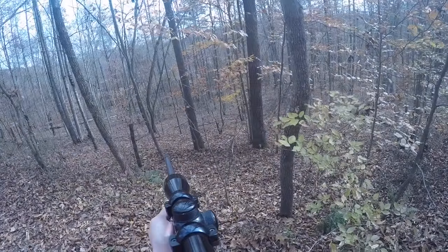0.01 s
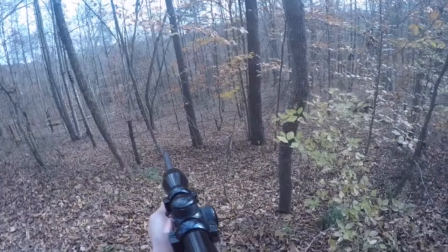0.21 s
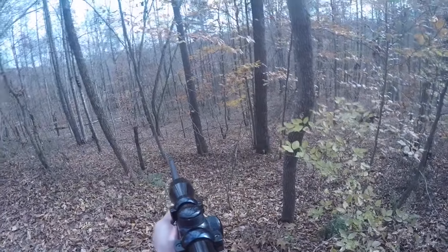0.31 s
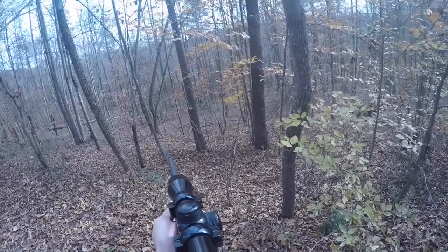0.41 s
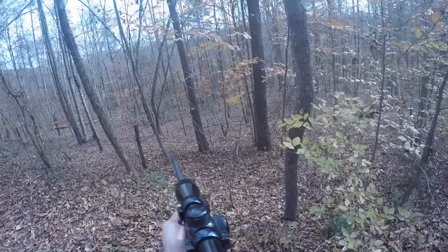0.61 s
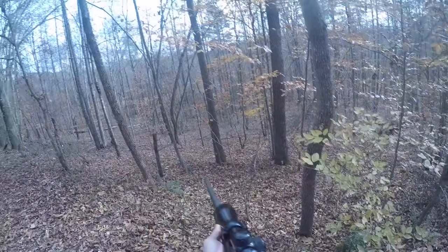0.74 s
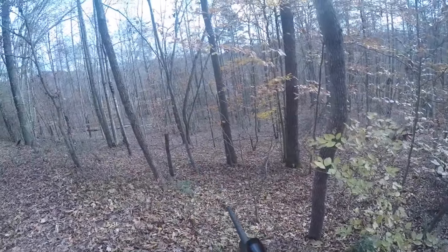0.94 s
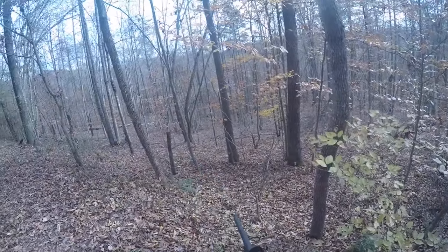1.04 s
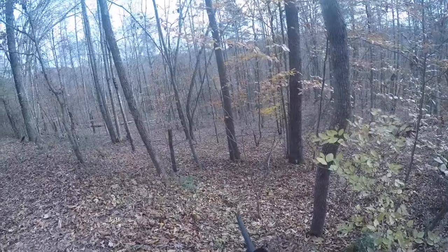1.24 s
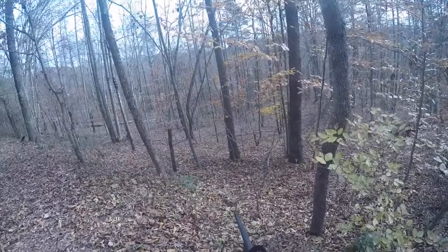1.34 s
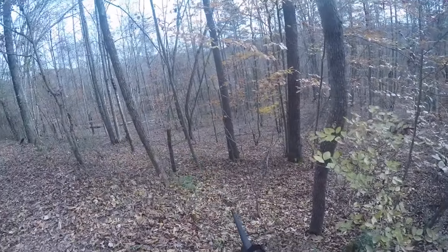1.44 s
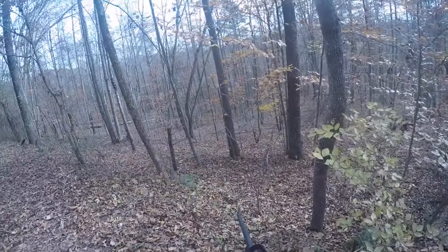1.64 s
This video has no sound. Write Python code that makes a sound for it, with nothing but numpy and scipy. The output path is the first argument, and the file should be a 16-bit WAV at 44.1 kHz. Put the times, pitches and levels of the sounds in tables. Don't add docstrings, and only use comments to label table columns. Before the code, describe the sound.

After a moment of light wind rumble, a single hard rifle crack overloads the nearby microphone. Quick slaps off trees blur into a long dying woodland echo, ending with small dry clicks of the gun's action.

```python
import sys
import numpy as np
from scipy import signal
from scipy.fft import rfft, irfft
from scipy.io import wavfile
from scipy.ndimage import uniform_filter1d

SR = 44100
rng = np.random.default_rng(int(sys.argv[2]) if len(sys.argv) > 2 else 0)


def file_out(sig):
    cols = np.atleast_2d(sig).T
    lim = np.clip(cols, -1, 1)
    pcm = np.round(lim * 32767).astype(np.int16)
    wavfile.write(sys.argv[1], SR, pcm)


def nominal_scale(level):
    x = np.asarray(level, float) / 20
    return 10 ** x


N = 74970
T = np.arange(N) / SR
PIN_S, FREE_S, DROP_S = .2229, .22425, .2294


def rms_one(x):
    return x / np.sqrt(np.mean(x ** 2) + 1e-20)


def at_hz(points, hz):
    table = np.array(points)
    return np.interp(np.log(hz), np.log(table[:, 0]), table[:, 1])


def drift(rate):
    r = np.exp(-80 * np.pi * rate / SR)
    noise = rng.standard_normal(N // 40 + 2002)
    slow = signal.lfilter([1], [1, -2 * r, r * r], noise)[2000:]
    return np.interp(np.arange(N) / 40, np.arange(len(slow)), rms_one(slow))


def ring(x, hz, t60):
    r, w = nominal_scale(-60 / (t60 * SR)), 2 * np.pi * hz / SR
    return signal.lfilter([0, np.sin(w)], [1, -2 * r * np.cos(w), r * r], x + 1e-18)


def low(x, hz):
    return signal.sosfilt(signal.butter(2, hz, fs=SR, output="sos"), x)


def fade(start, tau, length=0.):
    return (T >= start) * np.exp(-np.maximum(T - start - length, 0) / tau)


def coloured(x, spectrum):
    hz = np.maximum(np.fft.rfftfreq(N, 1 / SR), 1)
    gain_db = at_hz(spectrum, hz) - 200 * (hz < 20)
    return rms_one(irfft(rfft(x) * nominal_scale(gain_db), N))


# [t/s, level/dB]
WIND = [(0, -55.5), (.09, -48.5), (.2, -52), (.3, -82), (.45, -53.5), (.55, -64.5), (.75, -66), (1.0, -63),
        (1.15, -60.5), (1.25, -53), (1.4, -51.5), (1.55, -46), (1.62, -51.5), (1.7, -53)]
# [f/Hz, level/dB]
HISS = [(150, -9), (400, 7), (600, 3), (2500, 4), (6300, -0.5), (7500, -2), (14500, -9.5), (15300, -11.5)]


def air():
    wind_hz, skirt_hz, skirt_db = 46.6, 220, -17.5
    buffet_hz, buffet_db = 410, -10.5
    evenness = .6
    hiss_db, duck_db, recover_db_per_s = -62.5, 17.5, 14.5

    white = rng.standard_normal((2, N))
    gust = low(low(white[0], wind_hz), wind_hz * 1.2)
    skirt = low(white[0], skirt_hz)
    buffet = low(ring(white[1], buffet_hz, .006), 550)
    wind = rms_one(gust) + nominal_scale(skirt_db) * rms_one(skirt) + nominal_scale(buffet_db) * rms_one(buffet)
    wind = signal.sosfilt(signal.butter(2, 12, "high", fs=SR, output="sos"), wind)
    local_power = uniform_filter1d(wind ** 2, size=2600)
    wind = rms_one(wind / local_power ** (evenness / 2))

    ducked_db = (T > PIN_S) * np.maximum(duck_db - recover_db_per_s * (T - PIN_S), 0)
    hiss = nominal_scale(hiss_db - ducked_db) * coloured(white[1], HISS)
    return nominal_scale(np.interp(T, *np.transpose(WIND))) * wind + hiss


# [f/Hz, level/dB]
NEAR_COLOUR = [(60, -23.5), (190, -10), (620, -16.5), (2600, -8), (5000, -0.5), (6500, -6.5), (7300, -12),
               (15400, -17)]
MIDDLE_COLOUR = [(60, -12), (200, -13), (600, -15.5), (2600, 4.5), (3600, -4), (6600, -11), (7300, -13.5),
                 (15000, -33)]
FAR_COLOUR = [(220, -14), (360, 3), (750, -2.5), (2000, -1), (3100, -5.5), (3500, -17.5), (7000, -40.5),
              (9000, -54.5)]
# [f/Hz, fall time/s]
NEAR_FALL = [(100, .25), (400, 0.19), (1500, 0.34), (3000, 0.39), (6000, 0.31), (10000, 0.36),
             (15000, 0.26)]
MIDDLE_FALL = [(100, .8), (500, 0.56), (2500, 1.19), (5000, 1.71), (8000, 1.11), (11000, 0.6), (15000, .4)]
# [t/s, level/dB, width/s]
SWELLS = [
    (0.258, 3, 0.0052),
    (.268, -1, 0.0054),
    (.287, 4.5, 0.0088),
    (0.295, -2.5, 0.0035),
    (0.317, -2, 0.0047),
    (0.33, 4.5, 0.014),
    (0.561, 3, 0.12),
    (0.972, 2.5, 0.017),
    (1.09, 3.5, 0.029),
    (1.42, 3, 0.058),
]


def woods():
    near_db, middle_db, far_db = -18, -33, -41.5
    trunks_per_s, growth = 14000, 40000
    trunk_spread_db, patchy_db = 2.0, .7

    age = np.maximum(T - DROP_S, 0)
    share = np.minimum((trunks_per_s + growth * age) / SR, 1)
    size_db = trunk_spread_db * np.minimum(rng.exponential(1, N), 4)
    sizes = nominal_scale(size_db) * rng.standard_normal(N)
    grains = rms_one(sizes * (rng.random(N) < share) / np.sqrt(share))
    layers = [rfft(coloured(grains, colour)) for colour in (NEAR_COLOUR, MIDDLE_COLOUR, FAR_COLOUR)]

    octave = np.log2(np.maximum(np.fft.rfftfreq(N, 1 / SR), 1))
    shared, out = drift(42), 0
    for centre in np.arange(5.5, 14.6, .5):
        hz = 2 ** centre
        mask = np.maximum(1 - 2 * np.abs(octave - centre), 0)
        far_fall_s = at_hz([(1500, 8.7), (5000, 6.2)], hz)
        levels_db = (near_db - 60 * age / at_hz(NEAR_FALL, hz),
                     middle_db - 60 * age / at_hz(MIDDLE_FALL, hz),
                     far_db - 60 * age / far_fall_s)
        patch = nominal_scale(patchy_db * (shared + drift(20)))
        band = sum(nominal_scale(db) * irfft(x * mask, N) for db, x in zip(levels_db, layers))
        out = out + patch * band
    swell_db = sum(db * np.exp(-((T - s) / width) ** 2) for s, db, width in SWELLS)
    return out * nominal_scale(swell_db) * (T >= DROP_S)


# [t/s, peak level/dB, f/Hz]
SLAPS = [(.2395, -5, 1800), (.2408, -3, 5000), (.2504, -11, 3500), (.2524, -5, 3600), (.2554, 0, 3600),
         (.2626, -14, 4500), (.2790, -10, 3500), (.2807, -10, 4000), (.2868, -9, 3500), (.2885, -10, 4500),
         (.2897, -2, 4200), (.3005, -19, 2800), (.3060, -15, 2300), (.3223, -14, 3200), (.3258, -13, 2500),
         (.3328, -13, 3200), (.3491, -18, 4500), (.3505, -14, 2200), (.3600, -23, 2700), (.3748, -22, 2000),
         (.8233, -25, 1400), (.9600, -33, 2000)]
# [t/s, peak level/dB, f/Hz]
THUMPS = [
    (.2345, -12.5, 331),
    (.2415, -21.5, 278),
    (.260, -25.5, 250),
    (.324, -21, 310),
    (.405, -37.5, 133),
]


def slaps():
    white, out = rng.standard_normal(N), 0
    for rows, cycles, wake_db in ((SLAPS, 2.2, -13), (THUMPS, 3.2, -80)):
        for s, db, hz in rows:
            t60 = cycles / hz
            click = np.zeros(N)
            click[[int(s * SR), int((s + .25 / hz) * SR)]] = -1, .7
            pulse = low(ring(click, hz, t60), hz * 2.1)
            scatter = rms_one(ring(ring(white, hz, t60), hz, t60))
            wake = scatter * low(fade(s, .003), hz / 4)
            out = out + nominal_scale(db) * (pulse / np.abs(pulse).max() + nominal_scale(wake_db) * wake)
    return out


# [t/s, peak level/dB, spread of touches/s, ring level/dB, snap level/dB]
CLICKS = [
    (1.5528, -32, .0022, -4, -1),
    (1.6843, -30, .0035, -18, -12),
    (1.538, -51, .002, -10, -12),
]
# [f/Hz, level/dB, fall time/s]
STEEL_MODES = [(1000, -6, .012), (1950, -13, .02), (3000, -8, .012), (4963, -9, .024), (5270, 0, .021),
               (5572, -7, .025), (6686, -12, .012)]
# [f/Hz, level/dB, fall time/s]
SCUFF_BANDS = [(1000, -6, .004), (2700, -2, .006), (4000, -5, .006), (5600, 0, .002), (10000, -12, .0004)]


def action():
    draws = rng.random((len(CLICKS), 12))
    snapped, rung, rub = np.zeros(N), np.zeros(N), 0
    for (s, db, spread, ring_db, snap_db), d in zip(CLICKS, draws):
        touch_s = s + spread * (np.arange(4) + .8 * d[:4]) / 4
        at = (touch_s * SR).astype(int)
        touches = nominal_scale(db - 7.8 * d[4:8]) * np.sign(d[8:] - .5)
        rung[at] = nominal_scale(ring_db) * touches
        snapped[at] = nominal_scale(snap_db) * touches
        rub = rub + nominal_scale(db - 10) * low(fade(s, .001, spread), 600)
    modes = sum(nominal_scale(db) * ring(rung, hz, t60) for hz, db, t60 in STEEL_MODES)
    snap = ring(snapped, 1900, .0009)

    white = rng.standard_normal(N)
    scrape = sum(nominal_scale(db) * rms_one(ring(white, hz, t60)) for hz, db, t60 in SCUFF_BANDS)
    scuff = rub * rms_one(scrape)

    leaf_s, leaf_wide_s, leaf_hz, leaf_db = .845, .03, 9800, -77
    crackle = rms_one(ring(ring(white, leaf_hz, .0012), leaf_hz, .0012))
    leaf = nominal_scale(leaf_db) * np.exp(-((T - leaf_s) / leaf_wide_s) ** 2) * crackle
    return modes + snap + scuff + leaf


# [t/s, level/dB, length/s, centre f/Hz]
STAGES = [
    (.2140, -29, .0022, 5000),
    (.2163, -15, .0012, 6500),
    (.2177, -9, .0025, 3200),
    (.2205, 4, .0023, 6200),
    (.2276, -1, .0007, 6000),
    (.2297, -13, .0035, 5200),
]


def blast():
    white, bursts = rng.standard_normal(N), 0
    for s, db, length, hz in STAGES:
        edges_hz = [hz * .55, hz * 1.225]
        band = signal.sosfilt(signal.butter(2, edges_hz, "bandpass", fs=SR, output="sos"), white)
        top_db = -2 if db > 0 else -18
        turbulence = rms_one(band) + nominal_scale(top_db) * white
        bursts = bursts + nominal_scale(db) * fade(s, .0004, length) * turbulence

    swell_s, swell_db = .2178, -14.5
    pinned, rest, rest_per_s, creep_s = -1.05, .5, 115, .0007
    swelling = (T >= swell_s) & (T < PIN_S)
    held = (T >= PIN_S) & (T < FREE_S)
    freed = (T >= FREE_S) & (T < DROP_S)
    creep = rest + rest_per_s * (T - FREE_S) - (1 + rest) * fade(FREE_S, creep_s)
    push = nominal_scale(swell_db) * swelling + pinned * held + creep * freed

    kick = np.zeros(N)
    kick[int(DROP_S * SR)] = -nominal_scale(-7.5)
    membrane = ring(kick, 189, .03)
    strain = nominal_scale(-30) * low(white, 6000) * ((T >= PIN_S) & (T < DROP_S))
    return bursts + strain + low(push, 1400) + membrane


def scene():
    return (air() + woods() + slaps() + action() + blast())[None]


def roll_off(x):
    return signal.sosfilt(signal.butter(12, 16510, fs=SR, output="sos"), x)


def record(dry):
    dip_hz, dip_wide_hz, dip_depth = 8300, 2200, .45
    dip = signal.lfilter(*signal.iirpeak(dip_hz, dip_hz / dip_wide_hz, fs=SR), dry)
    top_cut = signal.cheby2(10, 30, 15150 * 1.03, fs=SR, output="sos")
    x = signal.sosfilt(top_cut, dry - dip_depth * dip)
    x = .96 * x / (1 + np.abs(x) ** 6) ** (1 / 6)
    x = signal.sosfilt(signal.cheby2(10, 50, 16500, fs=SR, output="sos"), x)
    return roll_off(np.clip(x, -1, 1))


dry = scene()
out = record(dry)
file_out(out)
```